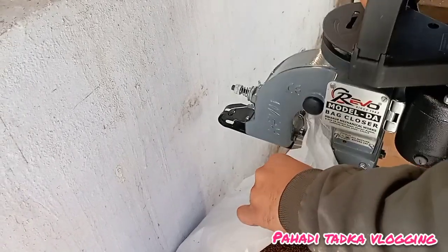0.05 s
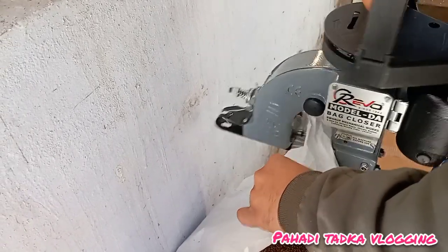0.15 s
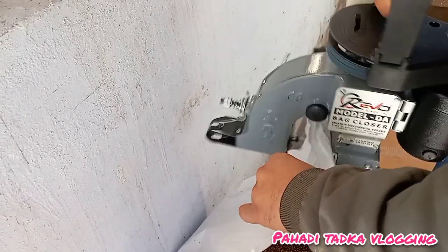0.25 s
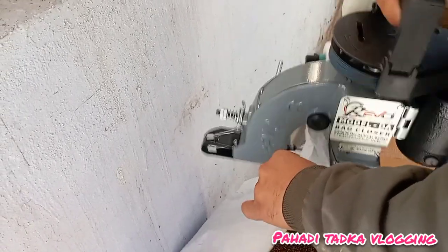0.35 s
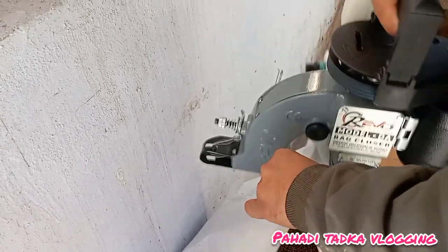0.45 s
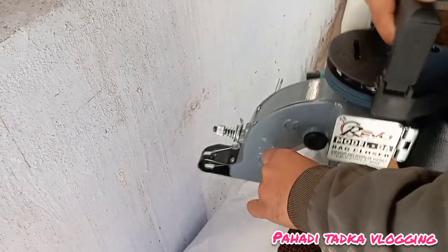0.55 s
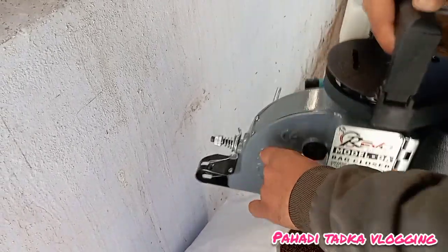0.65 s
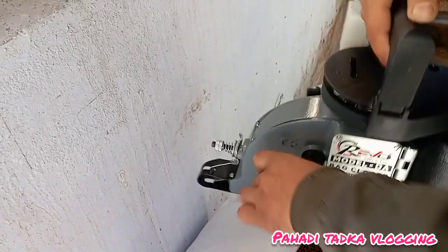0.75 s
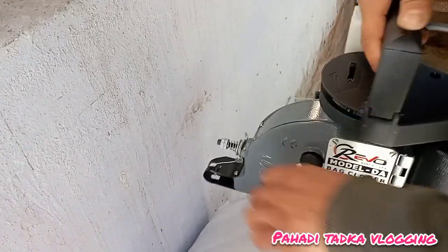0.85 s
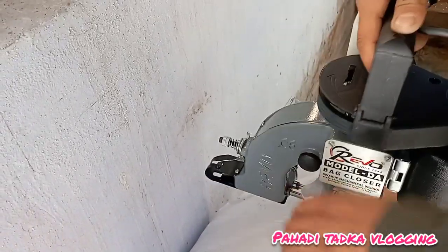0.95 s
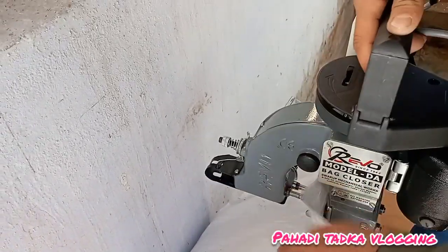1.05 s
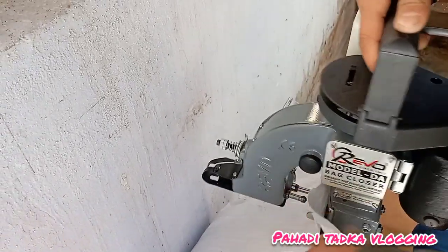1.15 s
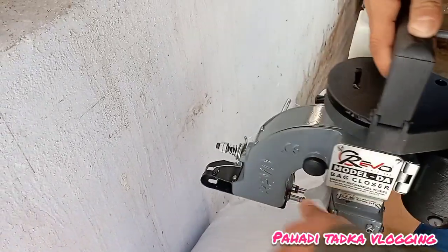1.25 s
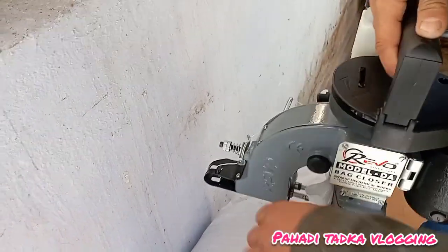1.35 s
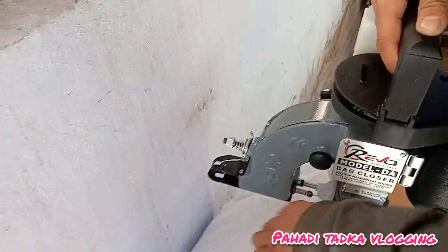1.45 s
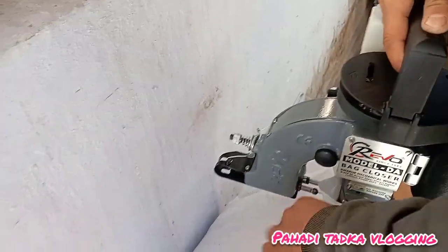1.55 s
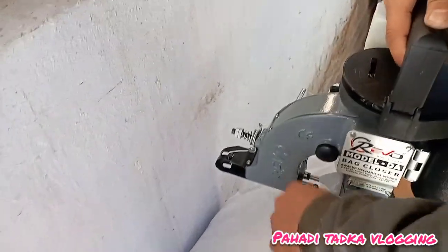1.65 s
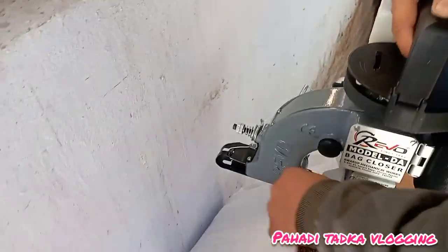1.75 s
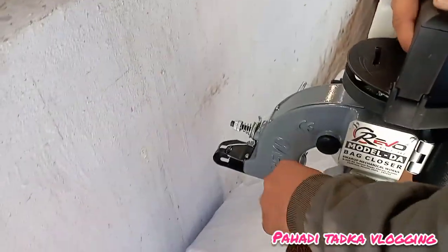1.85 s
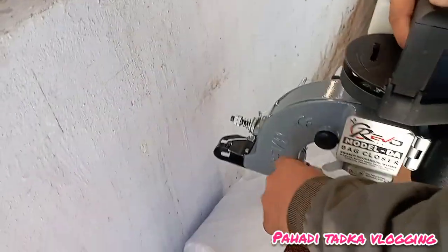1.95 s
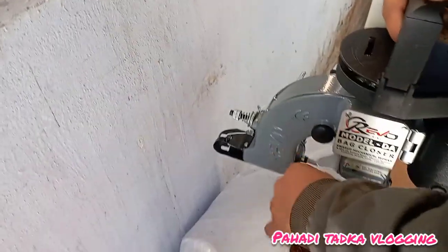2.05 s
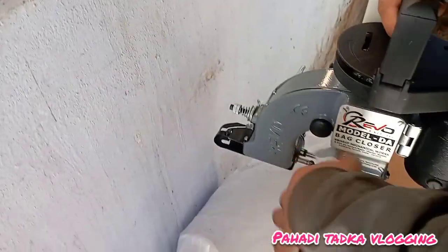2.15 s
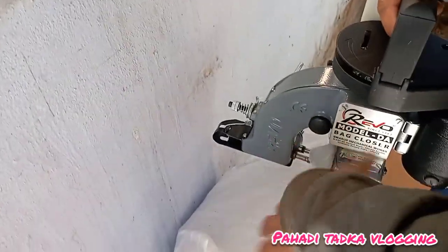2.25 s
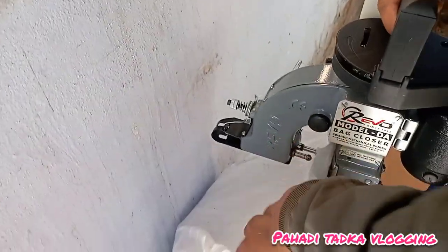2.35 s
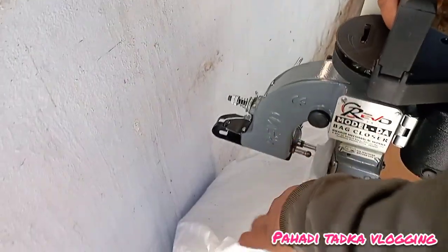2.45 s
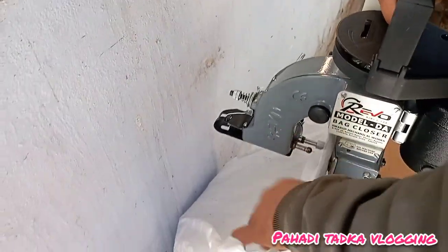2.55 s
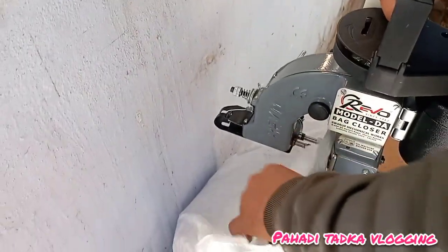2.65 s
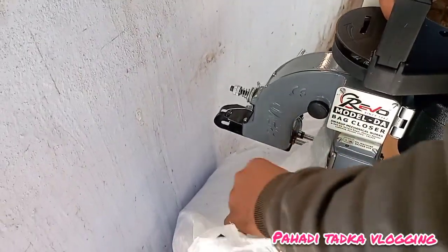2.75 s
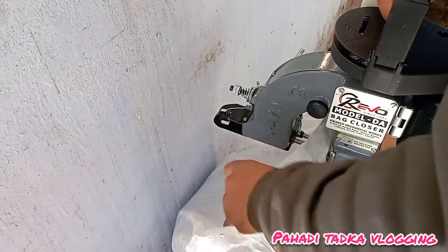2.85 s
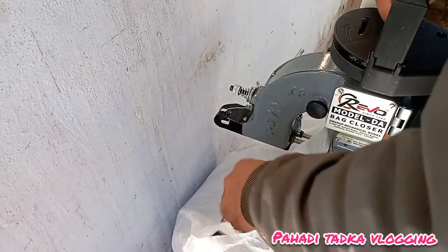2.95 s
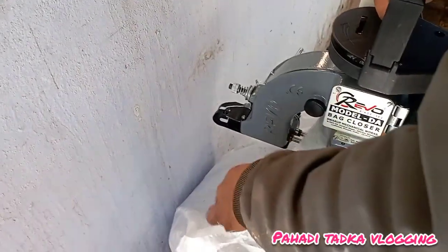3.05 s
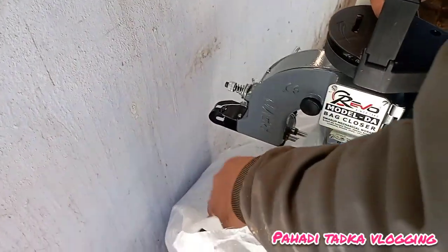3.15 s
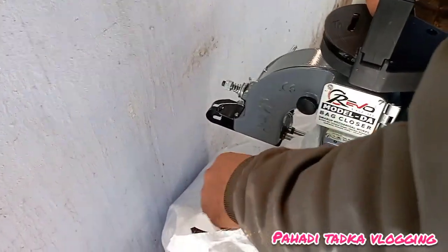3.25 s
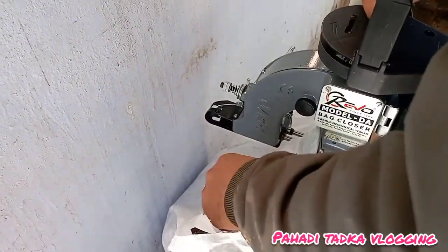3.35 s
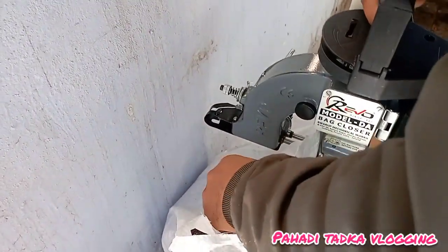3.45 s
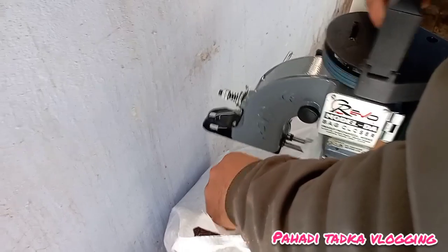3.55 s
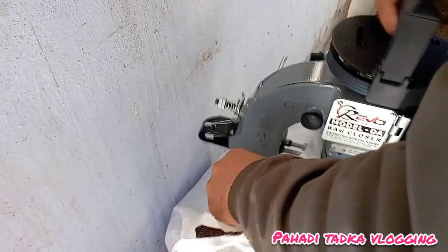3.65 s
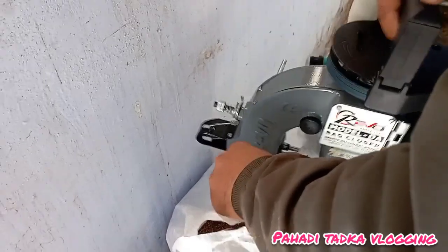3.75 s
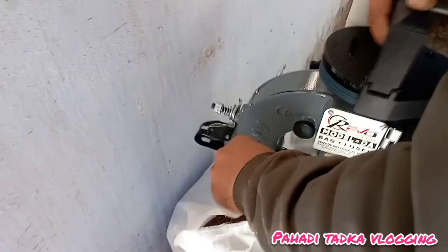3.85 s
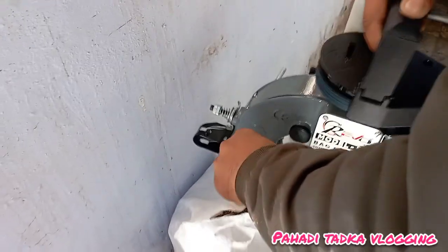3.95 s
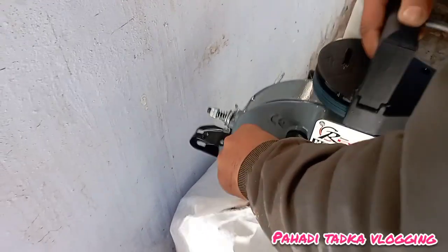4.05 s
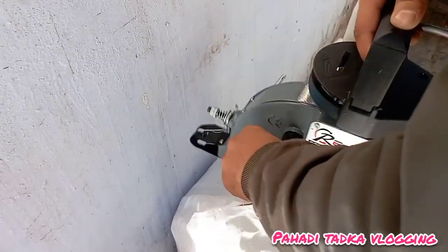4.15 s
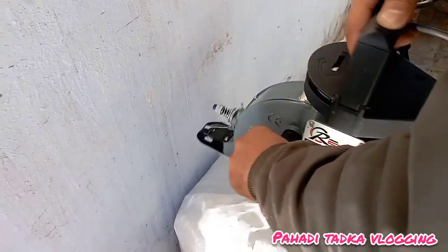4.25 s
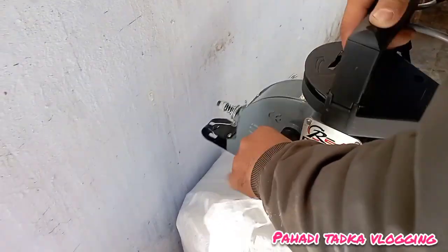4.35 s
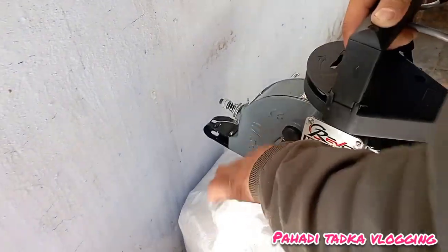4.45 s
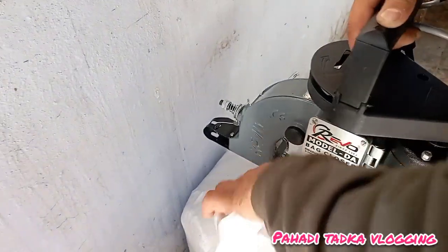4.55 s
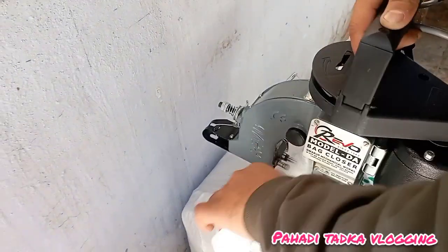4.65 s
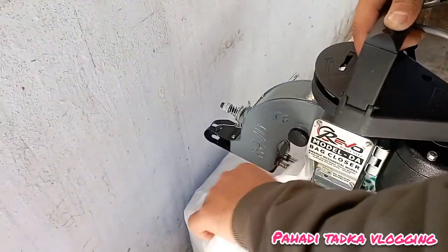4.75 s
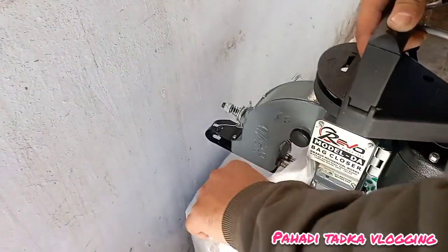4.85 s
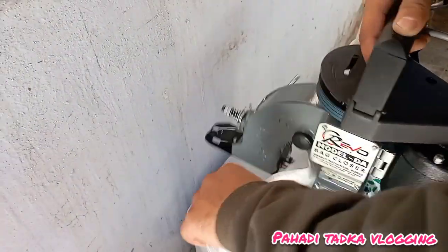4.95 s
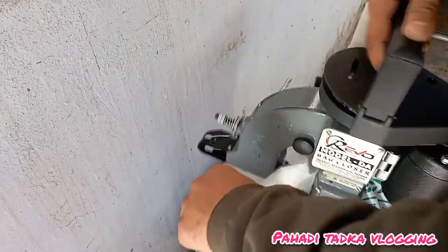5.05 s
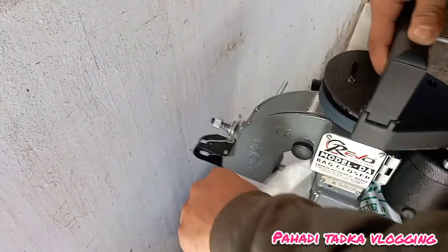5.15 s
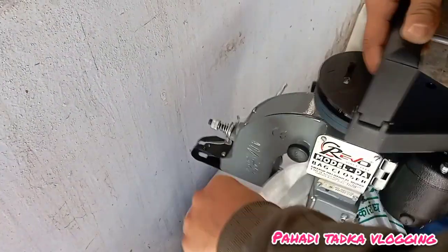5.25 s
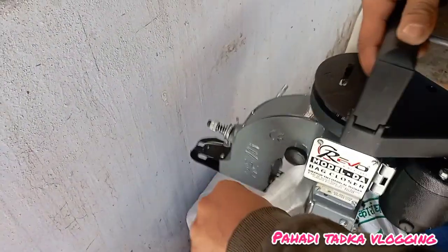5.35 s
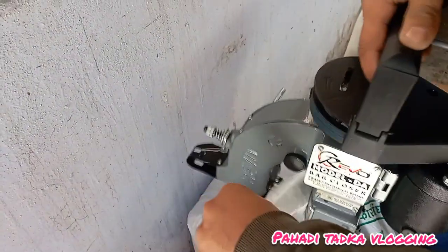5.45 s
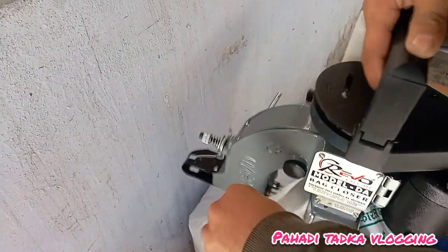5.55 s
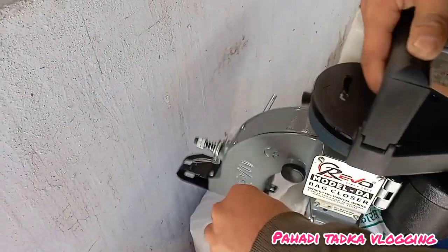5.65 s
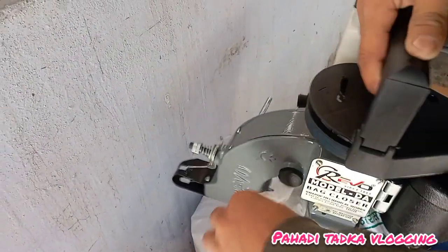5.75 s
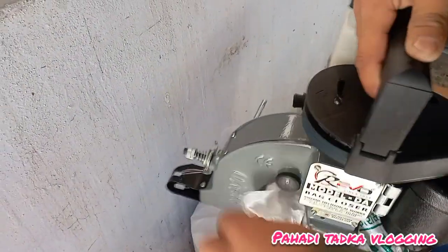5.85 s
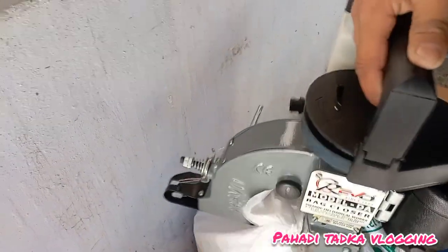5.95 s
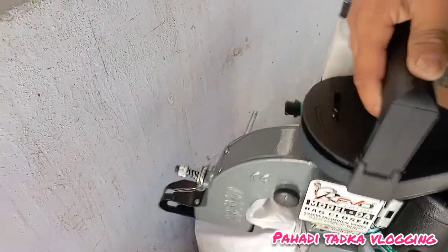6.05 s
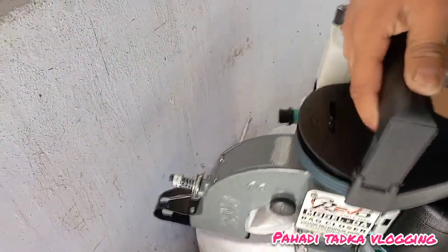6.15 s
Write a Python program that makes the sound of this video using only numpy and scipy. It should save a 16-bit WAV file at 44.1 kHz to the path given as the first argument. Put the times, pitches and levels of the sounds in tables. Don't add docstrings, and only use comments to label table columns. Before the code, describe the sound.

Rushing, knocking bursts from a small electric bag stitcher alternate with crisp plastic sack crackle, ending with the motor still running.

```python
import sys
import numpy as np
from scipy import signal
from scipy.fft import rfft, irfft
from scipy.io import wavfile
from scipy.ndimage import uniform_filter1d

SR = 44100
rng = np.random.default_rng(int(sys.argv[2]) if len(sys.argv) > 2 else 0)


def amplitude_ratio(level_db):
    exponent = np.asarray(level_db, float) / 20
    return 10 ** exponent


def master(y):
    cut = np.clip(np.atleast_2d(y).T, -1, 1)
    pcm = np.round(cut * 32767)
    wavfile.write(sys.argv[1], SR, pcm.astype(np.int16))


N = 274302
T = np.arange(N) / SR
FREQ = np.fft.rfftfreq(N, 1 / SR)

# [freq_hz, level_db]
MURMUR = [(35, -20), (70, 0), (200, -2), (500, -8), (1200, -18), (6000, -21), (15000, -26)]
# [freq_hz, level_db]
LEFT_PORT = [(100, 0.5), (400, -1), (1000, -4.5), (1400, 8), (2500, 3.5), (5500, -0.5), (6600, -2.5),
             (7600, -0.5), (8800, 4.5), (10000, 1.5), (11500, -3), (13000, -17), (15500, -6.5)]
RIGHT_PORT = [(1000, -0.5), (1600, 9.5), (2400, 3), (3000, 6.5), (4000, 10.5), (5000, 9), (6600, 13),
              (7800, 11.5), (9300, 4), (10500, 5.5), (12500, 3.5), (15500, -0.5)]
# [mean_delay_s, level_db]
ECHOES = [(.00035, -11), (.0008, -18)]

# [peak_s, fade_s, weave_db, rumple_db]
STROKES = [(0.0, 0.3, -50, -40), (1.09, 0.13, -45.5, -41.5), (1.24, 0.36, -56, -49.5),
           (1.497, 0.011, -46, -35), (1.551, 0.043, -40.5, -46), (1.682, 0.045, -37.5, -38.5),
           (1.8, 0.12, -49, -44), (2.1, 0.058, -46, -48.5), (2.17, 0.039, -48.5, -48),
           (2.33, 0.18, -47.5, -51.5), (2.409, 0.12, -49, -41), (2.494, 0.028, -42.5, -36),
           (2.58, 0.12, -40, -39), (2.7, 0.12, -70, -48.5), (2.82, 0.12, -45, -48.5), (2.97, .04, -47, -49),
           (3.02, 0.12, -44, -48), (3.16, 0.056, -46, -53), (3.28, .02, -58, -58), (3.36, 0.033, -47, -51),
           (3.47, .02, -62, -64), (4.44, 0.046, -49, -47), (4.58, 0.18, -43, -40.5), (4.7, 0.19, -53, -58),
           (4.82, 0.038, -41, -51)]
# [snap_s, peak_db, centre_hz, left_minus_right_db]
CRACKS = [(1.174, -27, 3400, -9), (1.2216, -23, 7200, -2), (1.2976, -34.5, 4480, -17),
          (1.3307, -28.5, 6780, -9), (1.479, -22.5, 6330, -10), (1.608, -26, 7990, -7),
          (1.6382, -16.5, 4700, -8), (1.901, -19, 7300, -8), (2.009, -27.5, 5040, -3),
          (2.059, -32, 3870, -12), (2.263, -23, 6600, -7), (2.3175, -16, 6200, -16.5),
          (2.3403, -19, 6000, -2), (2.4494, -15.5, 2530, -2), (2.49, -27, 5330, 0), (2.5388, -18, 4200, -8),
          (2.5653, -16, 6750, -1), (2.639, -18.5, 6000, -1), (2.7683, -30, 4630, -6), (2.804, -9, 5300, -6),
          (2.9696, -23, 5900, -6), (3.0084, -17.5, 6800, -11), (3.1476, -24.5, 5760, -9.5),
          (3.156, -36, 6620, -8), (3.2815, -27, 6640, -9), (3.348, -29, 6700, -17), (3.365, -30, 7100, -3),
          (3.46, -30, 7310, -6), (3.4802, -28, 4540, -3), (3.5194, -22, 6890, -2)]
# [snap_s, peak_db, centre_hz,
# left_minus_right_db]
FOLDS = [(1.0846, -39, 6000, -10), (1.1175, -15, 4620, -7), (1.1313, -23, 4140, -13),
         (1.1368, -22, 4520, -4), (1.155, -21, 6970, 2), (1.2324, -32, 4240, -6), (1.497, -19.5, 7100, -6),
         (1.5077, -26, 5810, -12), (1.6748, -16, 5800, -10), (1.6822, -25, 5270, -6),
         (1.6994, -33, 8100, -2), (2.393, -21.5, 7430, -6), (3.126, -35, 5880, 2), (3.193, -29, 6190, -7.5),
         (4.569, -30, 5210, -11), (4.6644, -28, 7020, -7), (4.7467, -27, 6360, -6), (4.777, -36, 7200, -4),
         (4.82, -20, 7220, -2), (4.949, -19, 6270, 2)]
# [freq_hz, level_db]
RUMPLE = [(30, -39), (56, -10), (112, 2), (316, 1.5), (450, -1), (700, -5.5), (1100, -11.5), (2000, -66)]

# [press_s, release_s, top_pitch_hz of shaft order 22, coast_loss_hz_per_s, main_knock_s]
BURSTS = [
    (-1.5, -.26, 4400, 11200, .02),
    (.1155, .668, 4371, 12900, .591),
    (3.496, 4.075, 4398, 10800, 3.86),
    (4.921, 7, 4433, 11000, 5.63),
]
# [time_s, left_minus_right_db as it turns, gear_load_db from cloth, open_vents_db]
HAND = [(0, -6, 0, 8), (.17, -6.5, -4.5, -4), (.35, -10, 1, 6.5), (.5, -7, -0.5, -14), (.69, -9, 2.5, 7),
        (.94, -11, 5, 5), (3.55, -5, -1.5, -8), (3.65, -6, 1, 4), (3.82, -8, 5, 4), (3.93, -6.5, 2, -7),
        (3.99, -5, -0.5, -13), (4.17, -7, 2.5, 4), (4.97, -6.5, 3, 2), (5.25, -7.5, 2, -6),
        (5.45, -8, 2, -0.5), (5.71, -6.5, 0.5, -7), (5.9, -10, 0, -0.5), (6.22, -9.5, -1.5, 2.5)]
# [freq_hz, level_db]
RUSH = [(300, 3), (1000, 6.5), (1700, -0.5), (2400, 4), (3000, 0.5), (3800, 7), (5000, 2), (6600, 9.5),
        (7600, 9), (8800, 9), (11000, 8), (15500, 6)]
# [shaft_order, chopped_air_db relative to the rush]
FAN_ORDERS = [(22, -17.5), (33, -6.5), (44, -9.5), (55, -6.5), (66, -7)]
# [freq_hz, level_db]
HOUSING = [(500, -1), (1250, 5), (1500, -8.5), (1700, -0.5), (2000, -11.5), (2400, -1), (2900, -4.5),
           (3450, 4.5), (3800, -5), (4100, -5.5), (4400, -4.5), (6000, 0)]
# [share_of_stitch, casting_db, handle_db, rush_throb 0-1]
KNOCKS = [
    (0., 0, 0, .5),
    (.34, -11, -5, .3),
    (.65, -11, 0, .3),
]
# [mode_hz, level_db, t60_s]
CASTING = [(746, 0, .11), (818, -5, .06), (690, -13, .05), (1680, -19, .04)]
# [mode_hz, level_db, t60_s]
HANDLE = [(120, -3, 0.33), (216, 6.5, 0.028), (301.3, 2, 0.1), (348.7, -3.5, 0.2), (385, 6, 0.059),
          (521, 0.5, 0.054)]
# [full_speed_db, loss_db in step with speed, slope_db per decade of speed]
RUSH_LAW = (-20.5, 10.95, 17.3)
CASTING_LAW = (-31.5, 11, 8)
HANDLE_LAW = (-31.5, 6.6, 10.7)

ALIKE_HZ, LEAD_S = 770, 0.000272
ROOM_DB, MAINS_HZ = -58, 50
RISE_SHARE, REST_WEAVE_DB, REST_RUMPLE_DB = 0.34, -57.5, -56
CRACK_T60_S, FOLD_T60_S = 0.019, 0.049
QUICK_SHARE, QUICK_S, SLOW_S = 0.9, 0.105, 0.5
LANDING_HZ, FULL_HZ = 350, 4300
ORDERS_PER_STITCH = 141.0
STRAIN_DB, BITE_S = 5, 0.049
JOLT_S, JOLT_DB = 0.04, 5
CONTACT_S = 0.0004
FAN_DB, SLOT_DB, LOW_DB, LOW_FADE_DB = -25.5, -39, -37, 11
GLIDE_BLUR, TURN_GAIN = 0.32, 0.96


def colour(points):
    hz, db = np.transpose(points)
    gain = amplitude_ratio(np.interp(np.log(FREQ + 1), np.log(hz), db))
    ceps = irfft(np.log(gain), N)
    ceps[1:N // 2] *= 2
    ceps[N // 2 + 1:] = 0
    return np.exp(rfft(ceps))


LEFT, RIGHT = colour(LEFT_PORT), colour(RIGHT_PORT)


def shape(x, response):
    return irfft(rfft(x) * response, N)


def ports(x, other, alike_hz=ALIKE_HZ):
    alike = np.clip(0.012 + 0.8 / (1 + (FREQ / alike_hz) ** 3), 0, 1)
    shared = rfft(x) * np.sqrt(alike) * np.exp(2j * np.pi * FREQ * LEAD_S)
    left = shared + rfft(other) * np.sqrt(1 - alike)
    return irfft(np.array([left * LEFT, rfft(x) * RIGHT]), N)


def unit(x, lo, hi):
    power = np.abs(rfft(x.mean(axis=0))[(FREQ > lo) & (FREQ < hi)]) ** 2
    return x * N / np.sqrt(2 * power.sum())


def walk(rate):
    hold = max(int(SR / rate), 1)
    steps = rng.standard_normal(N // 8)[np.arange(N) // max(hold, 9)]
    slewed = uniform_filter1d(uniform_filter1d(steps, hold), hold)
    return slewed / slewed.std()


def ring(x, modes):
    total = 0
    for hz, db, t60 in modes:
        pole = np.exp(2j * np.pi * hz / SR - np.log(1000) / (t60 * SR))
        total = total + amplitude_ratio(db) * signal.lfilter([1], [1, -pole], x).imag
    return total


def room():
    level = amplitude_ratio(ROOM_DB + 3.0 * walk(5.36))
    murmur = shape(rng.standard_normal((2, N)), colour(MURMUR))
    return level * unit(ports(*murmur), 50, 700)


def strokes():
    weave, rumple = amplitude_ratio(REST_WEAVE_DB) ** 2, amplitude_ratio(REST_RUMPLE_DB) ** 2
    for s, fade_s, weave_db, rumple_db in STROKES:
        pace_s = max(fade_s, 0.01) * np.where(T < s, RISE_SHARE, 1)
        swell = np.exp(-2 * np.abs(T - s) / pace_s)
        weave = weave + amplitude_ratio(weave_db) ** 2 * swell
        rumple = rumple + amplitude_ratio(rumple_db) ** 2 * swell
    return np.sqrt(weave), np.sqrt(rumple)


def weave_cracks():
    cracks, lag = np.zeros((2, N + SR)), np.arange(SR // 8) / SR
    rows = [(*row, CRACK_T60_S) for row in CRACKS] + [(*row, FOLD_T60_S) for row in FOLDS]
    noises = rng.standard_normal((len(rows), 2, SR // 8))
    for (s, db, hz, pan_db, t60), noise in zip(rows, noises):
        noise *= np.minimum(0.25 + lag / 0.0015, 1)
        noise[:, 50:52] = 4.0
        fade = np.exp(-np.log(1000) * lag / max(t60, 0.004)) + 0.12 * np.exp(-lag / 0.047)
        band = signal.butter(2, [hz / 1.77, min(hz * 2.0, 0.45 * SR)], "band", fs=SR)
        crack = signal.lfilter(*band, noise * fade)
        side_db = np.array([[pan_db / 2 + 3.0], [-pan_db / 2 - 2.5]])
        gain = amplitude_ratio(db - 6.0 + side_db) / np.abs(crack).max()
        start = int(s * SR) - 30
        cracks[:, start:start + len(lag)] += gain * crack
    return ports(cracks[1, :N], cracks[0, :N], 300)


def sack():
    weave, rumple = strokes()
    slips = rng.random(N) < 900 / SR
    grains = slips * amplitude_ratio(6.0 * np.minimum(rng.exponential(size=N), 3))
    grains = signal.lfilter([1], [1, -np.exp(-1 / (0.0021 * SR))], grains)
    crackle = (grains + 0.59 * grains.mean()) * amplitude_ratio(1.57 * walk(34.9)) * rng.standard_normal((2, N))
    dull = amplitude_ratio(2.5 * walk(30)) * shape(rng.standard_normal((2, N)), colour(RUMPLE))
    cracks = weave_cracks()
    weave = weave * unit(ports(*crackle), 1800, 21000)
    return weave + rumple * unit(ports(*dull), 80, 1000) + cracks


def burst():
    table = np.transpose(BURSTS)
    return table[:, np.searchsorted(table[0], T, side="right") - 1]


def speed():
    press, release, top_hz, loss, _ = burst()
    held = np.minimum(T, release) - press
    quick = QUICK_SHARE * np.exp(-held / QUICK_S)
    slow = (1 - QUICK_SHARE) * np.exp(-held / SLOW_S)
    hz = top_hz * (1 - quick - slow)
    coast = LANDING_HZ * np.logaddexp(0, (hz - loss * (T - release)) / LANDING_HZ)
    return np.where(T > release, coast, hz)


def by_speed(pace, full_db, step_db, decade_db):
    return amplitude_ratio(full_db - step_db * (1 - pace) + decade_db * np.log10(pace + 1e-9))


def stitch_phase(turns):
    count = turns / ORDERS_PER_STITCH
    return count - np.interp(burst()[-1], T, count)


def gear(phase, pace):
    casting, handle, throb = np.zeros(N), np.zeros(N), np.ones(N)
    for share, casting_db, handle_db, depth in KNOCKS:
        at = np.flatnonzero(np.diff(np.floor(phase - share)) == 1)
        size = amplitude_ratio(rng.standard_normal((300, 2))[:len(at)])
        casting[at] += amplitude_ratio(casting_db) * size[:, 0]
        handle[at] += amplitude_ratio(handle_db) * size[:, 1]
        throb += depth * np.exp(-((phase - share) % 1) / 0.07)
    jolts = [int((row[0] + JOLT_S) * SR) for row in BURSTS[1:]]
    casting[jolts] += amplitude_ratio(JOLT_DB)
    push = np.hanning(int(2 * CONTACT_S * SR))
    casting = signal.lfilter(1.2 * push / push.sum(), [1], casting)
    clatter = rng.standard_normal(1400)[(phase % 1 * 1400).astype(int)] * pace
    rattle = rng.standard_normal((4, N))
    casting += amplitude_ratio(-39) * clatter + amplitude_ratio(-36) * rattle[0] * np.exp(-(phase % 1) / 0.3)
    handle += amplitude_ratio(-29) * clatter + amplitude_ratio(-29) * rattle[2]
    casting = ports(ring(casting, CASTING), ring(casting + amplitude_ratio(-37) * rattle[1], CASTING))
    handle = ports(ring(handle, HANDLE), ring(amplitude_ratio(-27.0) * rattle[3], HANDLE))
    handle = signal.sosfilt(signal.butter(5, 108, "high", fs=SR, output="sos"), handle)
    casting = signal.sosfilt(signal.butter(4, 640, "high", fs=SR, output="sos"), casting)
    return unit(casting, 600, 900), unit(handle, 90, 450), throb


def whine(turns, order, tone_db, hump_db, hump_hz, waver_db=4.5):
    turn = 2 * np.pi * order / 22 * turns
    made = []
    for _ in range(2):
        tone = amplitude_ratio(tone_db + waver_db * walk(20)) * np.sin(turn + 0.25 * walk(40))
        hump = amplitude_ratio(hump_db) * walk(hump_hz) * np.cos(turn)
        made.append(tone + hump)
    return np.array(made) * np.sqrt(2)


def motor_tones(turns, pace, powered, open_vents):
    pull = np.cos(2 * np.pi * 2 * MAINS_HZ * T + 0.8 * walk(6))
    fan = amplitude_ratio(FAN_DB) * open_vents * (0.75 + 0.25 * powered * (1 + pull))
    slot = amplitude_ratio(SLOT_DB) * open_vents * powered * (1 + 0.9 * pull)
    low = amplitude_ratio(LOW_DB - LOW_FADE_DB * pace ** 6) * np.sqrt(pace) * (0.6 + 0.4 * powered)
    tones = pace ** 4 * fan * whine(turns, 22, -7, -17, 500, waver_db=3.0)
    tones += pace * slot * whine(turns, 12, 2, -14, 250, waver_db=2.5)
    tones += pace * low * whine(turns, 11, -9, -5, 300)
    return shape(tones, colour(HOUSING))


def nearby(x):
    out = x.copy()
    for delay_s, db in ECHOES:
        for port in range(2):
            path_s = delay_s * (1 + 0.22 * port + 0.11 * walk(2.1))
            out[port] += amplitude_ratio(db) * np.interp(T - path_s, T, x[port])
    return out


def machine():
    hz = uniform_filter1d(speed(), SR // 100)
    turns, pace = np.cumsum(hz) / SR, np.clip(hz / FULL_HZ, 0, 1)
    s, pan_db, load_db, open_db = np.transpose(HAND)
    pan, load = amplitude_ratio(np.interp(T, s, pan_db + 7)), amplitude_ratio(np.interp(T, s, load_db))
    open_vents = amplitude_ratio(np.interp(T, s, open_db))
    press, release = burst()[:2]
    bite = np.clip((T - press) / BITE_S, 0, 1) ** 2
    strain = amplitude_ratio(uniform_filter1d(STRAIN_DB * (1 - pace) * (T < release), SR // 50))
    vents = pan ** -TURN_GAIN
    rush = vents * by_speed(pace, *RUSH_LAW) * bite * strain
    cast = bite * load * by_speed(pace, *CASTING_LAW)
    thump = bite * load * by_speed(pace, *HANDLE_LAW)
    casting, handle, throb = gear(stitch_phase(turns), np.sqrt(pace))
    glide = np.clip(np.abs(np.gradient(hz)) * SR / 6000, 0, 1)
    turns = turns + GLIDE_BLUR * glide * walk(150)
    grit = amplitude_ratio(1.06 * walk(900) + 1.5 * walk(25)) * throb
    air = unit(ports(*shape(grit * rng.standard_normal((2, N)), colour(RUSH))), 3650, 12700)
    chop = pace ** 4 * sum(whine(turns, order, -40, db - 6, 900) for order, db in FAN_ORDERS)
    powered = uniform_filter1d(1.0 * (np.gradient(hz) > -0.02), SR // 30)
    tones = motor_tones(turns, pace, powered, open_vents)
    air = nearby(rush * air + ports(*(rush * chop + tones)))
    air[0] *= pan
    return air + cast * casting + thump * handle


def scene():
    return machine() + sack() + room()


def band_limit(x):
    return signal.sosfilt(signal.butter(12, 17020, fs=SR, output="sos"), x)


def record(dry):
    dry = signal.sosfilt(signal.butter(3, 56, "high", fs=SR, output="sos"), dry)
    dry = 1.15 * np.tanh(dry / 1.15)
    mix = signal.sosfilt(signal.ellip(12, 0.2, 80, 15700, fs=SR, output="sos"), dry)
    return band_limit(mix)


dry = scene()
out = record(dry)
master(out)
```